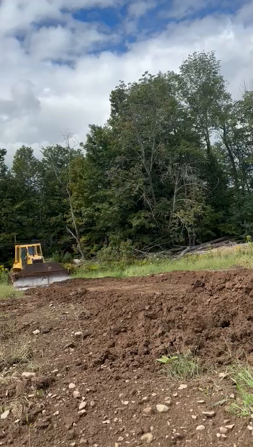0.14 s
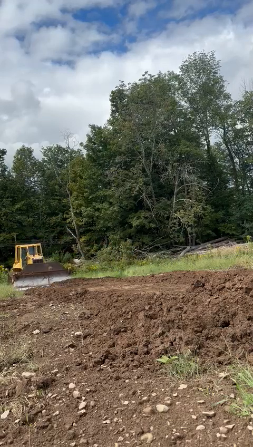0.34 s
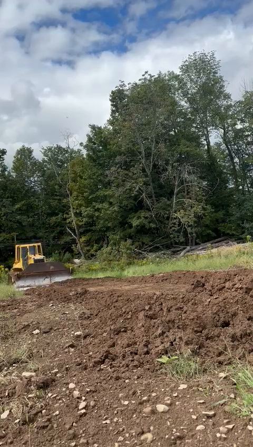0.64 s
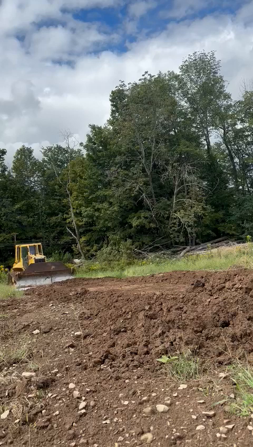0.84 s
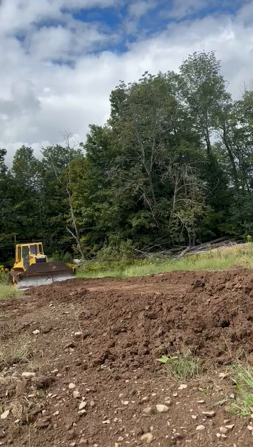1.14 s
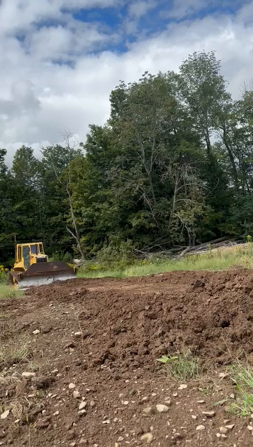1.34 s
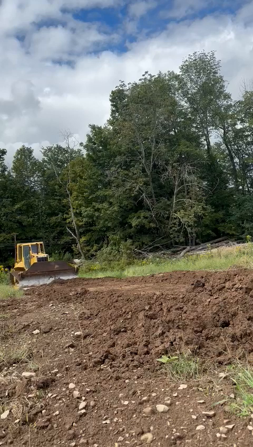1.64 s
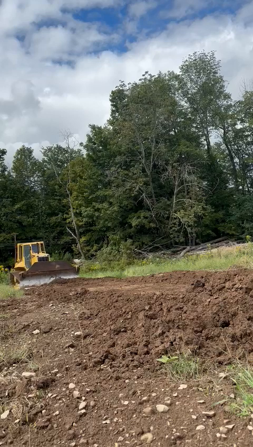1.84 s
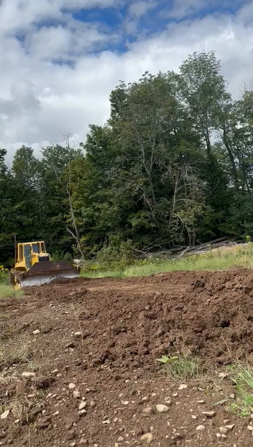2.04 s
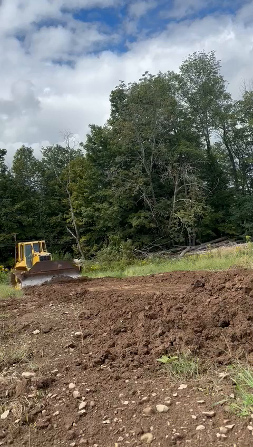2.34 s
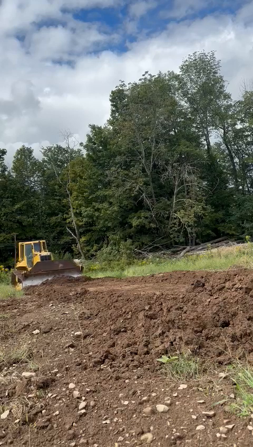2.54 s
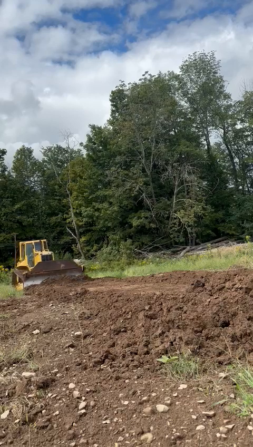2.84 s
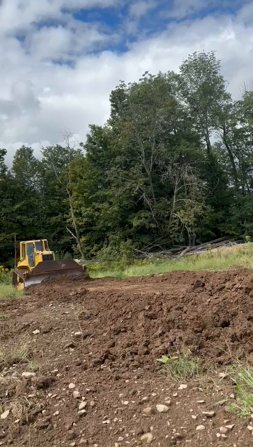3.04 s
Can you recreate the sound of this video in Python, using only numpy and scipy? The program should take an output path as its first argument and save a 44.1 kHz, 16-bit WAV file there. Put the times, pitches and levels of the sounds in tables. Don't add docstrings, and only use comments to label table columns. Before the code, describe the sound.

Outdoors, a phone picks up a working crawler dozer: throaty diesel drone rising in pitch over two seconds, then levelling, irregular low track knocks and clanks, and piercing pin squeals, strongest near two seconds.

```python
import sys
import numpy as np
from scipy import signal
from scipy.fft import rfft, irfft
from scipy.io import wavfile
from scipy.ndimage import uniform_filter1d

SR = 44100
rng = np.random.default_rng(int(sys.argv[2]) if len(sys.argv) > 2 else 0)


def decibels_to_gain(level_db):
    exponent = np.asarray(level_db, float) / 20
    return 10 ** exponent


def store_pcm(level_fs):
    pcm = np.round(np.clip(level_fs, -1, 1) * 32767).astype(np.int16)
    wavfile.write(sys.argv[1], SR, np.atleast_2d(pcm).T)


N = 141120

# time in seconds, firings per second, exhaust effort in dB.
SPEED = [(0, 71.69, -30.5), (0.2, 75.14, -29), (0.451, 79.43, -32), (0.7, 84.46, -33.5),
         (0.998, 87.52, -29.5), (1.301, 90.12, -29.5), (1.599, 91.7, -27), (1.898, 93.56, -27.5),
         (2.202, 94.77, -27.5), (2.601, 95.35, -25.5), (3.2, 95.46, -25)]
STRONG = [3, 6, 9, 11, 12, 15, 16, 18, 24, 30, 32, 36, 38, 41, 42, 43, 47, 48, 53, 56, 59]
STRONG_DB = [20.5, 23.4, 11.5, 8.3, 15.6, 1.7, 9.1, 17.2, 21.6, 25, 29, 15, 4.5, 5.5, 5.3, 7.8, 12, 5.7, 14,
             7.7, 13.7]
# frequency in Hz, gain in dB.
PIPE = [(35, -49), (70, -21.5), (180, -30.5), (260, -21), (281, -32.5), (400, -58.5), (700, -33),
        (1300, -40)]
# frequency in Hz, density in dB.
RUMBLE = [(22, -38), (33, -28), (45, -5), (70, -4), (100, -8), (165, 0), (250, -6), (330, -14), (450, -40)]
KNOCK = [(200, 4), (380, -6), (680, -6), (1100, -5.5), (1500, -7), (2400, -15), (2700, -19), (4300, -25)]
HISS = [(4000, -18.5), (4900, -12.5), (5150, -2), (5600, -3.5), (6500, -9.5), (7800, -3), (8800, -6.5),
        (9600, -19)]
BARK = [(250, -22), (400, -2.5), (550, 3.5), (700, -1.5), (900, -5.5), (1200, -14.5), (1800, -40.5)]
LUG = [(900, -42), (1040, 5), (1150, -20), (1280, 7), (1390, -9.5), (1490, 2.5), (1650, -41)]
# time in seconds, peak in dB, frequency in Hz.
THUDS = [(0.062, -36.5, 171.5), (0.196, -24, 137), (0.269, -33, 137), (.43, -27, 146), (0.514, -22.5, 178),
         (0.552, -23, 224), (.692, -32.5, 147), (0.746, -22, 165), (0.784, -21.5, 135), (0.981, -24, 164),
         (1.049, -20.5, 151), (1.161, -25.5, 121), (1.21, -31, 125), (1.45, -29, 160), (1.558, -23, 172),
         (1.606, -18.5, 173.4), (1.65, -20, 179), (1.797, -16.5, 166.5), (1.84, -23.5, 150),
         (1.999, -16, 176.4), (2.039, -26.5, 186.4), (2.199, -20, 152), (2.415, -22.5, 187),
         (2.501, -26.5, 138), (2.607, -28, 152), (2.65, -28, 168.5), (2.812, -21.5, 170.4),
         (2.894, -26, 140), (2.958, -21, 148), (2.989, -15.5, 158.5)]
# time in seconds, peak in dB, frequency in Hz.
CLANKS = [(.333, -31, 485), (.435, -32, 640), (.506, -23, 650), (.522, -30, 480), (.74, -32, 590),
          (.82, -29, 625), (1.0, -25, 660), (1.21, -27, 482), (1.28, -27, 700), (1.386, -31, 476),
          (1.539, -29, 627), (1.598, -24, 620), (1.649, -29, 493), (1.8, -26, 550), (2.011, -30, 600),
          (2.083, -25, 625), (2.19, -29, 480), (2.39, -30, 940), (2.477, -29, 503), (2.687, -30, 546),
          (3.08, -28, 690)]
# start in seconds, length in seconds, level in dB, frequency in Hz, glide in Hz.
SQUEALS = [(.59, .17, -55.5, 4700, -10), (.755, .035, -51, 4680, 0), (.79, .08, -61, 4690, 0),
           (1.14, .13, -55, 4640, 30), (1.24, .11, -53, 4680, 60), (1.345, .1, -49, 4745, -30),
           (1.442, .062, -47, 4755, 20), (1.5, .045, -52, 4789, 0), (1.55, .035, -50, 4780, 0),
           (1.62, .12, -59, 4750, 0), (1.736, .064, -48, 4716, 0), (1.795, .06, -49, 4712, 0),
           (1.85, .035, -55, 4700, 0), (1.878, .106, -46, 4703, 30), (1.982, .035, -51, 4740, 0),
           (2.012, .1, -45, 4748, 0), (2.105, .14, -54, 4750, 20), (2.63, .04, -62, 4780, 0),
           (2.655, .066, -48, 4790, 20), (2.722, .054, -49, 4783, 30), (2.778, .09, -46, 4795, -20),
           (2.855, .13, -43.5, 4775, -20), (2.975, .08, -51, 4808, 0), (3.048, .085, -49, 4811, 0),
           (3.14, .06, -59, 4800, 0)]
# start and length in seconds, level in dB, frequency and glide in Hz.
WHISTLES = [
    (.435, .045, -44, 5290, 0),
    (.552, .036, -41, 5260, -60),
    (1.961, .071, -30, 5225, -50),
    (2.008, .065, -35, 5230, -130),
    (2.062, .045, -40, 5160, 170),
    (2.098, .052, -33, 5195, -110),
    (2.15, .125, -47, 5160, -80),
]
# start in seconds, level in dB.
CHIRPS = [
    (0.02, -58),
    (0.493, -58.5),
    (2.31, -61),
]
PULSE_SWELL_DB = [-4, -1, -1, 0]
# frequency in Hz, left over right in dB.
LEAN = [(60, 0), (330, -.7), (700, 4.5), (1100, 5), (2200, .5), (3100, 7), (4400, .5), (5300, 0)]
# frequency in Hz, lead of the left in radians.
LEAD = [(60, 0), (200, .13), (690, 1.1), (1600, .05), (2400, .1), (2800, .6), (3500, 0), (7000, 0)]
# frequency in Hz, likeness from 0 to 1.
SAME = [(240, 1.), (420, .92), (1000, .91), (2300, .98), (2700, .65), (4400, .75), (5300, 1.), (7000, 1.)]

CYLINDERS = 6
ORDER_SPREAD_DB, WAVER_DB, WAVER_RAD = 2.5, 1.5, .35
PUMP_ORDER, PUMP_DB = 25.3, -44.5
RUMBLE_DB, KNOCK_DB, HISS_DB, BARK_DB, LUG_DB = -30.5, -35.5, -46, -39, -42
RUMBLE_RISE_DB, KNOCK_RISE_DB, HISS_RISE_DB, BARK_RISE_DB, LUG_FADE_DB = 5.5, 6, 2, 5.5, 14
RUMBLE_GATE, KNOCK_GATE, HISS_GATE = 0.14, 0.13, 0.15
GATE_TURNS, BARK_TURNS = 0.36, .27
POP_HZ, POP_T60, POP_DB, POP_SPREAD_DB, POP_ODD_DB = 650, .022, -39.5, 2.5, -3
THUD_DB, THUD_T60, THUD_RISE_S = 1.5, 0.17, .01
CLANK_T60, CLANK_RISE_S = .17, .006
SQUEAL_EDGE_S = .009
PULSE_GAP_S, PULSE_S, PULSE_TOP_HZ, PULSE_FALL_HZ = .042, .02, 4880, 440
TOP_HZ, TOP_LEAD, TOP_SAME = 8800, -1.0, 0.55
NOTCH_HZ, NOTCH_WIDTH_HZ, NOTCH_DB, BASS_CUT_HZ = 4945, 60, -11, 28
GATE_FROM_HZ, GATE_DB, GATE_SPREAD_DB = 4450, -84.5, 4
GATE_KNEE_HZ, GATE_DB_PER_KHZ = 8450, 15


def evened(x):
    return x / np.sqrt(np.mean(np.abs(x) ** 2) + 1e-20)


def read(points, hz):
    f, value = np.transpose(points)
    return np.interp(np.log(hz + 1), np.log(f + 1), value)


def add(mix, s, sound):
    part = mix[round(s * SR):][:len(sound)]
    part += sound[:len(part)]


def drift(rate_hz, count):
    noise = rng.standard_normal((count, 400))
    knots = evened(uniform_filter1d(noise, max(round(100 / rate_hz), 1), axis=1))
    return [np.interp(np.arange(N) / SR, np.arange(400) / 100, k) for k in knots]


def coloured(points, patchy_db):
    hz = np.fft.rfftfreq(2048, 1 / SR)
    a, b, patches = rng.standard_normal((N // 512 + 5, 1025, 3)).T
    patches = uniform_filter1d(patches, 12, axis=0)
    patches = evened(uniform_filter1d(patches, 6, axis=1))
    ends_db = -60 * ((hz < points[0][0]) | (hz > 1.15 * points[-1][0]))
    z = (a + 1j * b) * decibels_to_gain((read(points, hz) + ends_db)[:, None] + patchy_db * patches)
    return evened(signal.istft(z, nperseg=2048, noverlap=1536)[1][:N])


def exhaust_orders(turns, firing, effort_db):
    orders = np.arange(2, 80)
    above_db = ORDER_SPREAD_DB * rng.standard_normal(80)
    above_db[STRONG] = STRONG_DB
    out = 0
    for k, swell, slip in zip(orders, drift(5, count=len(orders)), drift(3.4, count=len(orders))):
        loose = .3 if k % CYLINDERS == 0 else 1
        own_db = effort_db if k == CYLINDERS else effort_db.mean()
        level_db = own_db + above_db[k] + read(PIPE, k * firing / CYLINDERS) + loose * WAVER_DB * swell
        start = rng.random() * (k % CYLINDERS > 0)
        phase = 2 * np.pi * (k * turns / CYLINDERS + start) + loose * WAVER_RAD * slip
        out += decibels_to_gain(level_db) * np.sin(phase)
    return out


def firing_pulses(turns, decay_turns, spread_db, smooth):
    strength = decibels_to_gain(spread_db * rng.standard_normal(400))[turns.astype(int)]
    return evened(uniform_filter1d(np.exp(-(turns % 1) / decay_turns) * strength, size=smooth))


def pops(turns):
    fired, t = np.flatnonzero(np.diff(turns.astype(int))), np.arange(1200) / SR
    size, phase = rng.standard_normal((400, 2))[:len(fired)].T
    level_db = POP_SPREAD_DB * size + POP_ODD_DB * (np.arange(len(fired)) % 2)
    clicks = np.zeros(N, complex)
    clicks[fired] = decibels_to_gain(level_db) * np.exp(2j * phase)
    ring = decibels_to_gain(-60 * t / POP_T60) * np.minimum(t / .0015, 1) * np.exp(2j * np.pi * POP_HZ * t)
    return evened(signal.oaconvolve(clicks, ring)[:N].real)


def engine():
    s, rate, effort_db = np.transpose(SPEED)
    firing = uniform_filter1d(np.interp(np.arange(N) / SR, s, rate), size=4000)
    effort_db = np.interp(np.arange(N) / SR, s, effort_db)
    turns = np.cumsum(firing) / SR
    fast = (firing - rate.min()) / np.ptp(rate) - 1
    exhaust = exhaust_orders(turns, firing, effort_db)
    pump = decibels_to_gain(PUMP_DB + 15 * fast) * np.cos(2 * np.pi * PUMP_ORDER * turns / CYLINDERS)
    blow = firing_pulses(turns, GATE_TURNS, spread_db=2.5, smooth=30)
    puff = firing_pulses(turns, BARK_TURNS, spread_db=1.5, smooth=70)

    bark = decibels_to_gain(BARK_DB + BARK_RISE_DB * fast) * coloured(BARK, patchy_db=1.0) * puff
    lug = decibels_to_gain(LUG_DB - LUG_FADE_DB * (fast + 1)) * coloured(LUG, patchy_db=2.5) * (1 + puff) / 2
    rumble = decibels_to_gain(RUMBLE_DB + RUMBLE_RISE_DB * fast) * coloured(RUMBLE, patchy_db=0.14)
    rumble *= 1 + RUMBLE_GATE * np.cos(2 * np.pi * turns)
    knock = decibels_to_gain(KNOCK_DB + KNOCK_RISE_DB * fast) * coloured(KNOCK, patchy_db=0.82)
    knock *= 1 + KNOCK_GATE * (1 - fast) / 2 * (blow - 1)
    hiss = decibels_to_gain(HISS_DB + HISS_RISE_DB * fast) * coloured(HISS, patchy_db=2.2)
    hiss *= 1 - HISS_GATE + HISS_GATE * blow
    stack = decibels_to_gain(POP_DB + BARK_RISE_DB * fast) * pops(turns)
    return np.sqrt(2) * (exhaust + pump) + stack + bark + lug + rumble + knock + hiss


def tracks():
    out, t = np.zeros(N), np.arange(9000) / SR
    for s, db, hz in THUDS:
        shape = decibels_to_gain(db + THUD_DB - 60 * t / THUD_T60) * np.minimum(t / THUD_RISE_S, 1)
        add(out, s, shape * np.sin(2 * np.pi * hz * t))
    for s, db, hz in CLANKS:
        pair = np.sin(2 * np.pi * hz * t) + 0.22 * np.sin(2 * np.pi * 1.07 * hz * t)
        shape = decibels_to_gain(db - 60 * t / CLANK_T60) * np.minimum(t / CLANK_RISE_S, 1)
        add(out, s, shape * pair)
    return out


def squeals(rows, width_hz, clean, overtone_db, gain_db, lean_db, lead, same):
    out, r = np.zeros((2, N)), np.exp(-np.pi * width_hz / SR)
    a, b = rng.standard_normal((2, 2, N))
    left, other = evened(signal.lfilter([1], np.convolve([1, -r], [1, -r]), a + 1j * b))
    right = same * left + np.sqrt(1 - same ** 2) * other
    flutter = clean + (1 - clean) * np.array([left, right])
    flutter /= np.hypot(clean, 1 - clean)
    side = np.array([[.5], [-.5]])
    for s, length, db, hz, glide_hz in rows:
        start = round(s * SR)
        t = np.arange(min(round(length * SR), N - start)) / SR
        cycles = (hz - glide_hz / 2) * t + glide_hz * t ** 2 / length / 2
        tone = flutter[:, start:][:, :len(t)] * np.exp(2j * np.pi * cycles)
        octave = decibels_to_gain(overtone_db) * tone[0] ** 2 / abs(tone[0])
        shape = np.clip(np.minimum(t, length - t) / SQUEAL_EDGE_S, 0, 1)
        heard = ((decibels_to_gain(side * lean_db) * tone + octave) * np.exp(1j * side * lead)).real
        both = np.sqrt(2) * decibels_to_gain(db + gain_db) * shape * heard
        add(out.T, s, both.T)
    return out


def pins():
    squeal = squeals(SQUEALS, width_hz=130, clean=.54, overtone_db=-12,
                     gain_db=5, lean_db=4, lead=-1.7, same=.25)
    whistle = squeals(WHISTLES, width_hz=110, clean=.62, overtone_db=-28,
                      gain_db=-1.5, lean_db=5, lead=.2, same=.95)
    return squeal + whistle


def cricket():
    out, t = np.zeros(N), np.arange(0, PULSE_S, 1 / SR)
    cycles = PULSE_TOP_HZ * t - PULSE_FALL_HZ * t ** 2 / PULSE_S / 2
    pulse = np.sin(np.pi * t / PULSE_S) * np.sin(2 * np.pi * cycles)
    for s, db in CHIRPS:
        for k, swell_db in enumerate(PULSE_SWELL_DB):
            add(out, s + k * PULSE_GAP_S, 4 * decibels_to_gain(db + swell_db) * pulse)
    return out


def ports(x, lean, lead):
    hz = np.fft.rfftfreq(N, 1 / SR)
    scatter = rng.standard_normal(9000) * np.exp(-np.arange(9000) / 2200)
    spread = rfft(scatter / np.linalg.norm(scatter), N)
    same = np.clip(read(SAME + [(TOP_HZ, TOP_SAME)], hz), 0, 1)
    alike = np.sqrt((1 + same) / 2)
    unlike = np.sqrt((1 - same) / 2) * spread
    half = decibels_to_gain(read(lean, hz) / 2) * np.exp(.5j * read(lead, hz))
    return irfft(rfft(x) * np.array([(alike + unlike) * half, (alike - unlike) / half]), N)


def scene():
    dozer = ports(engine() + tracks(), LEAN, LEAD + [(TOP_HZ, TOP_LEAD)])
    return dozer + pins() + cricket()


def low_pass(x):
    return signal.sosfilt(signal.butter(12, 10560, fs=SR, output="sos"), x)


def record(dry):
    hz = np.fft.rfftfreq(N, 1 / SR)
    notch = decibels_to_gain(NOTCH_DB * np.exp(-((hz - NOTCH_HZ) / NOTCH_WIDTH_HZ) ** 2))
    bass = 1 - np.exp(-(hz / BASS_CUT_HZ) ** 2)
    housed = irfft(rfft(dry) * notch * bass, N)

    hz, _, z = signal.stft(housed, SR, "cosine", nperseg=2048, noverlap=1024)
    hz = hz[:1024, None]
    power = (abs(z[:, :1024]) ** 2).mean(0)
    bands = np.sqrt(power.reshape(128, 8, -1).mean(1))
    bands = bands * decibels_to_gain(GATE_SPREAD_DB * rng.standard_normal(bands.shape))
    bands = bands.repeat(8, axis=0)
    floor_db = GATE_DB + GATE_DB_PER_KHZ * np.clip((hz - GATE_KNEE_HZ) / 1000, 0, .6)
    z[:, :1024] *= (bands > decibels_to_gain(floor_db)) | (hz < GATE_FROM_HZ)
    gated = signal.istft(z, SR, "cosine", nperseg=2048, noverlap=1024)[1][:, :N]
    return low_pass(gated)


dry = scene()
out = record(dry)
store_pcm(out)
```